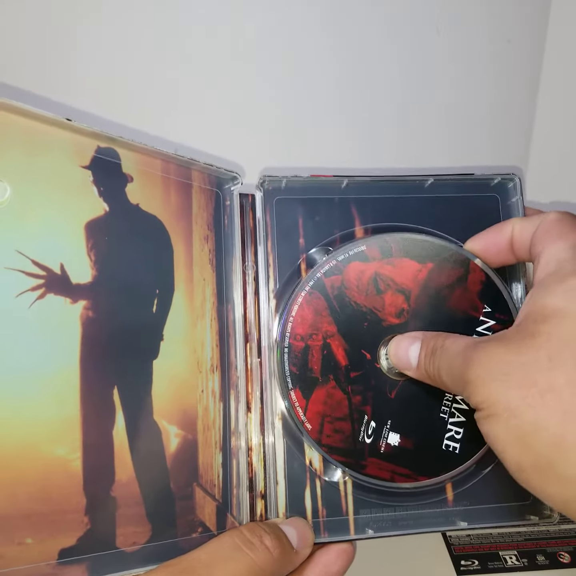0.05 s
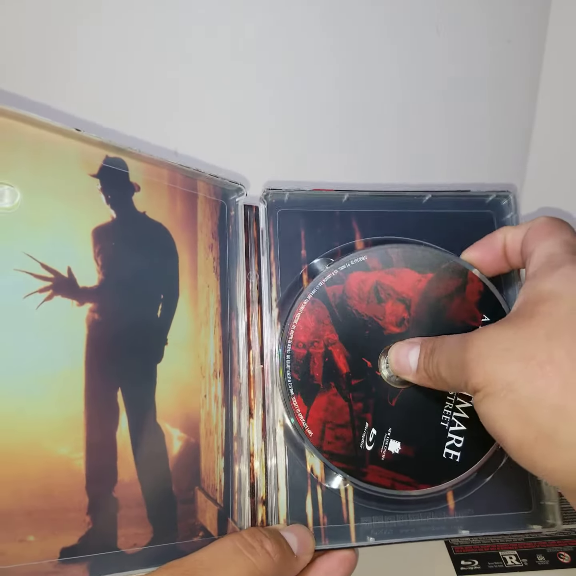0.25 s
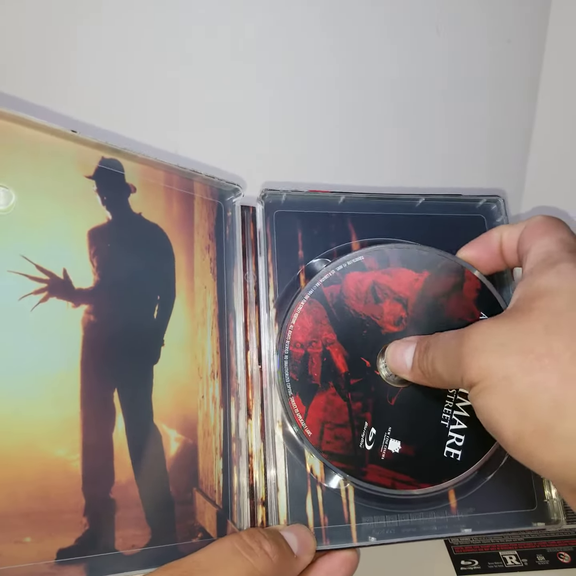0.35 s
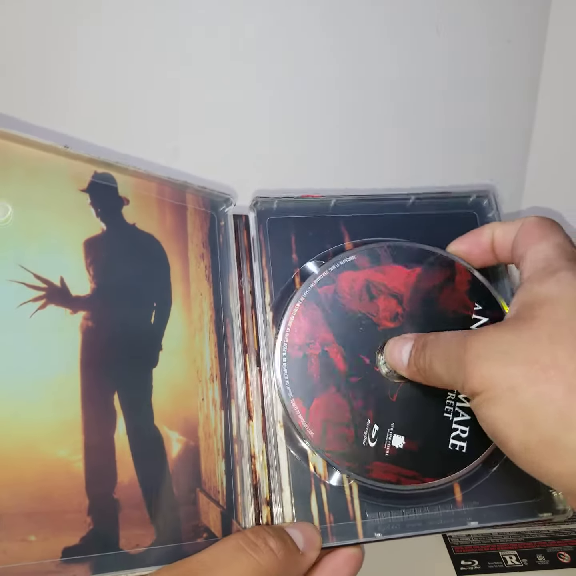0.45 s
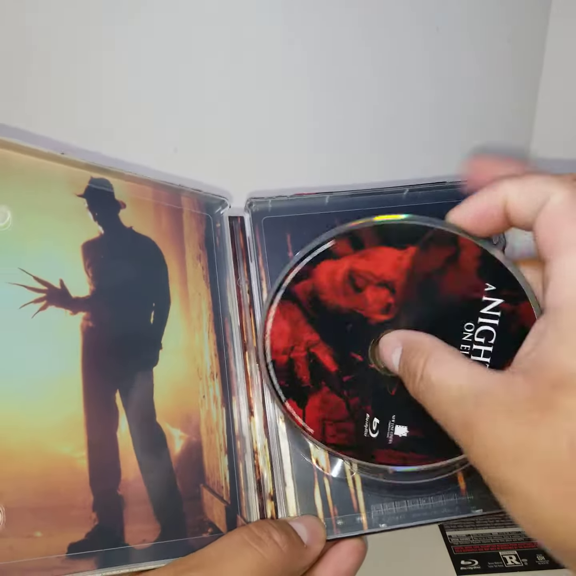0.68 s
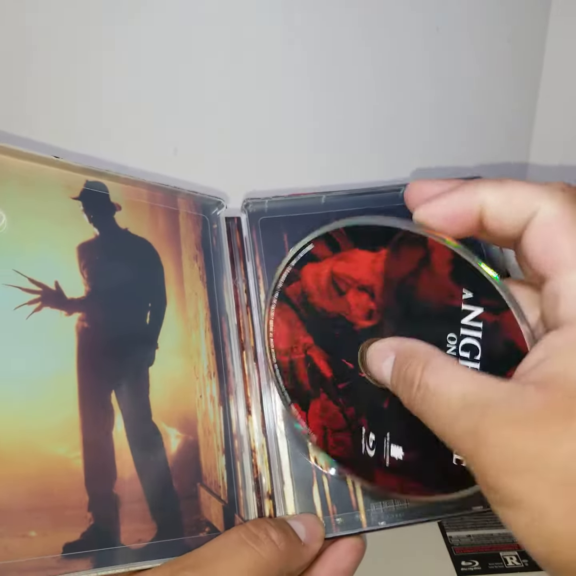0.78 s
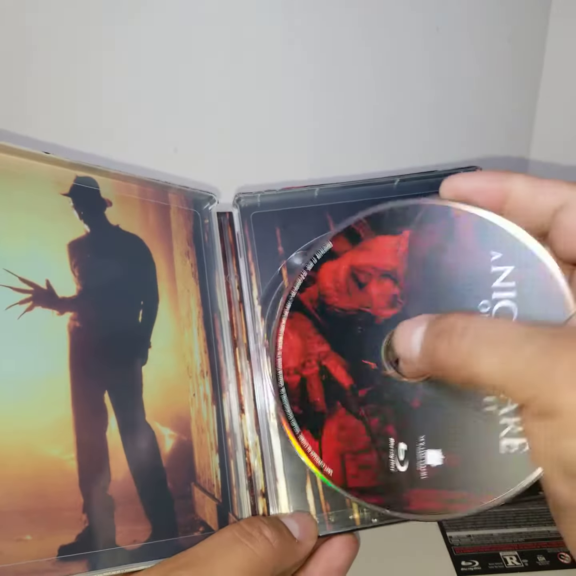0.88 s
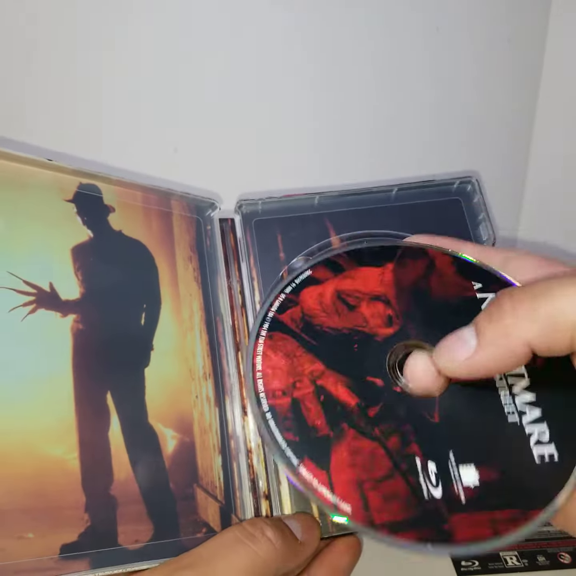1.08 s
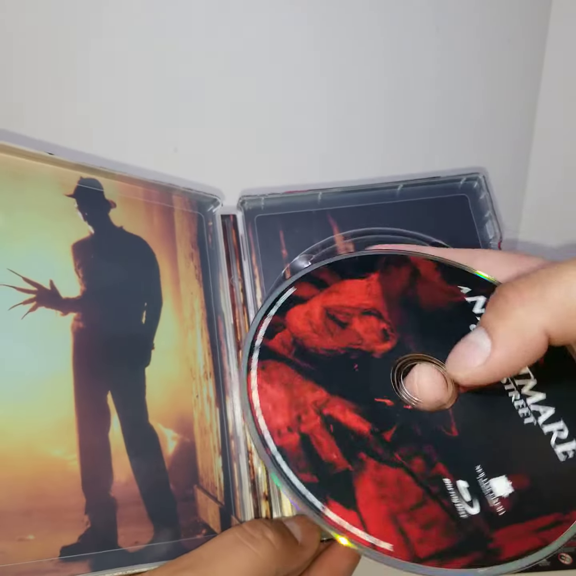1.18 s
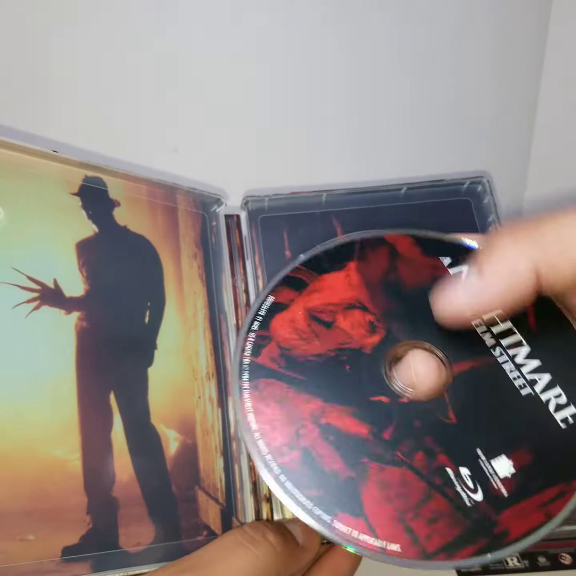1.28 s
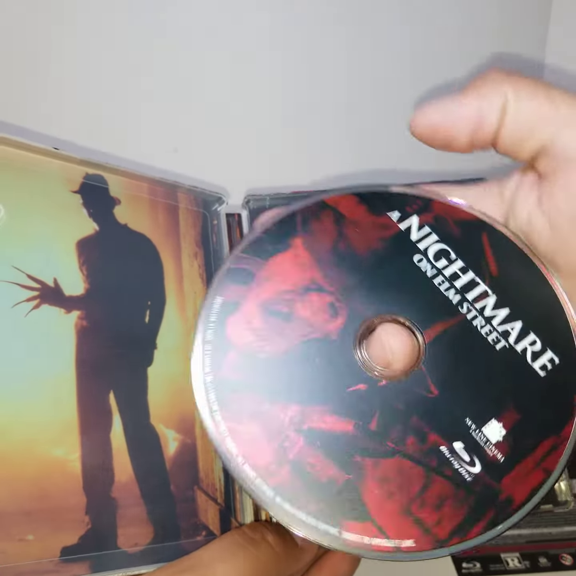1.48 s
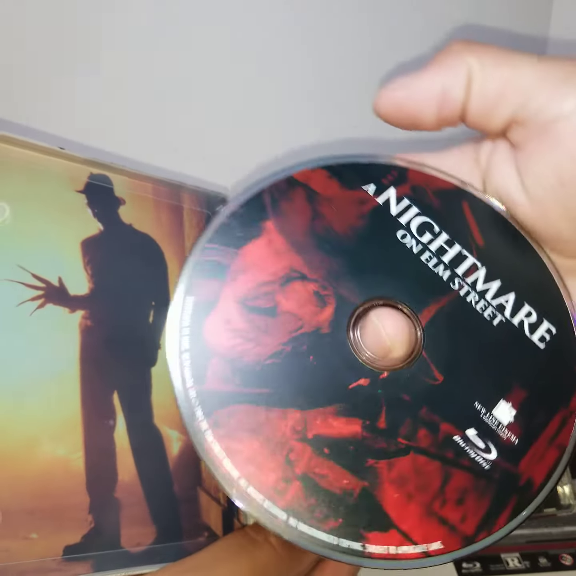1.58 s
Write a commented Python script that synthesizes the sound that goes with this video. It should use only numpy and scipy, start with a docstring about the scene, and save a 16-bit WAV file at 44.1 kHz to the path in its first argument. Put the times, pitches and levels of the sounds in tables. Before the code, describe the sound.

A disc snaps off its plastic case hub, followed by a few light ticks.

```python
"""A disc snaps over the teeth of the hub in its plastic case, close by in a small quiet room.
A thumb presses the hub: the disc slips in two quick bursts of cracks, the plastic rings and the
bent case thumps. Light ticks and a soft brush follow as the disc is lifted out.
Snaps and ticks leave a short echo. Behind them are two faint low tones and soft room noise,
which sinks after the snap and swells back at the end."""
import sys
import numpy as np
from scipy import signal
from scipy.fft import rfft, irfft
from scipy.io import wavfile
from scipy.ndimage import uniform_filter1d, minimum_filter1d

SR = 44100
rng = np.random.default_rng(int(sys.argv[2]) if len(sys.argv) > 2 else 0)


def waveform_to_disk(signal):
    """Save audio, clipped to [-1, 1], as 16-bit WAV at the path in sys.argv[1]."""
    frames = np.transpose(np.atleast_2d(signal))
    scaled = np.clip(frames, -1, 1) * 32767
    samples = np.round(scaled).astype(np.int16)
    wavfile.write(sys.argv[1], SR, samples)


N = 72765
T = np.arange(N) / SR

# Levels in a table are relative to each other. "fade" is the time a sound takes to drop by 60 dB.
# how strong the room noise is at each pitch: f/Hz, level/dB
NOISE_COLOUR = [(15, -44), (25, -15), (82, -7), (133, -6.5), (227, -1), (267, -4), (313, -4), (457, -10),
                (631, -6), (895, -11), (1620, -12), (5880, -25), (8580, -37), (10600, -51), (15500, -58)]
# how the room noise sinks and returns: t/s, low part's level/dB, high part's level/dB
NOISE_LEVELS = [(0, -40.5, -45), (0.2, -40, -44), (0.38, -46, -51), (0.62, -51.5, -54.5),
                (0.85, -53.5, -57), (1.05, -53.5, -56.5), (1.31, -54, -58.5), (1.41, -50.5, -53.5),
                (1.5, -44.5, -50.5), (1.65, -45, -47)]
# faint background tones: peak t/s, width/s, f/Hz, level/dB
TONES = [(0.662, 0.084, 539.6, -53.5), (1.116, 0.088, 338, -54)]
# how strong the echo is at each pitch: f/Hz, level/dB
ECHO_COLOUR = [(100, -14), (400, -9), (1100, -15.5), (1600, -14), (2100, -8.5), (2450, 0.5), (3100, -5),
               (3500, -9), (4400, -8.5), (4850, -5.5), (5600, -12), (7200, -19.5), (10000, -34),
               (15500, -48)]
# the hiss of the disc brushing the tray: f/Hz, level/dB
BRUSH_COLOUR = [(1000, -17), (3000, -1), (6000, 3), (9800, -13), (11500, -22), (15500, -30)]
# the noisy crack of each contact: f/Hz, level/dB
CRACK_COLOUR = [(100, -16), (400, 1), (1100, 2.5), (1600, 1), (2700, -5.5), (5500, 2), (7500, -12),
                (10000, -20), (15500, -25)]
# the loose disc touches hub and tray: t/s, level/dB, treble cut f/Hz, ring level/dB
TICKS = [(0.6335, -35, 3000, 3), (0.6611, -19.5, 7500, -3), (0.6981, -22, 7000, -11),
         (0.7110, -25, 5500, -5), (0.7356, -38, 3500, 0), (0.7672, -40, 6000, -5)]
# the notes of the disc's edge: f/Hz, level/dB, fade/s
EDGE_NOTES = [(2440, -8.5, 0.014), (3650, -3, 0.0051), (4220, -7, 0.011), (6100, -18.5, 0.0073),
              (7740, -15.5, 0.0041)]
# the case springs back in the hand: t/s, level/dB, f/Hz
THUMPS = [(0.2473, -26, 229), (0.2571, -25, 113), (0.2732, -27.5, 80.4)]
# the notes of the freed disc: f/Hz, level/dB, fade/s
DISC_NOTES = [(2280, -2.5, 0.27), (2464, -6, 0.35), (2455, 1, 0.23), (2520, -3, 0.22), (2650, -1, .24),
              (2794, 2, 0.17), (2928, -6, 0.14), (3005, -6, 0.18), (3230, 2.5, 0.16), (3630, -13, 0.22),
              (4750, -5.5, 0.24), (4900, 1, 0.18)]
# the notes of hub and tray: f/Hz, level/dB, fade/s
HUB_NOTES = [(463, -19, .02), (882, -19, .014), (1140, -27, .02), (1853, -20.5, 0.02), (2280, -20.5, 0.027),
             (2490, -11, 0.028), (2940, -13, 0.021), (3270, -16.5, .016), (3830, -18.5, 0.0086),
             (4880, -11, 0.013), (5600, -21.5, 0.011), (6600, -30, 0.0083), (8600, -26, 0.01),
             (11500, -31, 0.011)]
# the disc slips over the hub's teeth: t/s, level/dB, treble cut f/Hz
SLIPS = [(0.2293, -1.5, 9100), (0.2311, 5, 6400), (0.2342, -12, 6000), (0.2392, -16.5, 5500),
         (0.2416, -3, 5000), (0.2463, 4.5, 11000), (0.2493, -11, 7000), (0.2526, -20, 5000)]


def from_db(db):
    """Turn decibels into a number to multiply by."""
    return 10 ** (np.asarray(db) / 20)


def rms_one(x):
    """Scale a sound so that its average strength (rms) is 1."""
    return x / np.sqrt(np.mean(x ** 2) + 1e-20)


def keep_band(x, hz, side, order=2):
    """Keep the "low" or "high" side of hz; a higher order cuts more sharply."""
    return signal.sosfilt(signal.butter(order, hz, side, fs=SR, output="sos"), x)


def coloured_noise(colour):
    """Noise with its lows and highs shaped by a colour table."""
    hz, db = np.transpose(colour)
    pitches = np.maximum(np.fft.rfftfreq(N, 1 / SR), 1)
    gains = from_db(np.interp(np.log(pitches), np.log(hz), db))
    return rms_one(irfft(rfft(rng.standard_normal(N)) * gains, N))


def fade(fade_s):
    """A curve that drops by 60 dB in fade_s seconds."""
    return np.exp(-np.log(1000) * T / fade_s)


def rise(rise_s):
    """A curve that climbs from 0 towards 1, most of the way in rise_s seconds."""
    return 1 - np.exp(-T / rise_s)


def swell(peak_s, width_s):
    """A bell-shaped rise and fall around peak_s."""
    return np.exp(-.5 * ((T - peak_s) / width_s) ** 2)


def at(t, x):
    """Delay a sound to start at t seconds."""
    return np.concatenate([np.zeros(int(t * SR)), x])[:N]


def plastic_ring(notes, spread_db=1.63):
    """A knock sounds all of a part's own notes at once, each with a slightly random strength."""
    out = 0
    for k, (hz, db, fade_s) in enumerate(notes):
        strength = from_db(db + spread_db * rng.normal())
        out += (-1) ** k * strength * fade(fade_s) * np.sin(2 * np.pi * hz * T)
    return out


def room_noise(split_hz=1280):
    """A soft rush whose low and high parts sink and return."""
    times, low_db, high_db = np.transpose(NOISE_LEVELS)
    out = 0
    for db, side in ((low_db, "low"), (high_db, "high")):
        rush = rms_one(keep_band(coloured_noise(NOISE_COLOUR), split_hz, side))
        out += from_db(np.interp(T, times, db)) * rush
    return out


def faint_tones(waver_hz=7.7):
    """Low tones come and go, their pitch wavering a little."""
    out = 0
    for t, width_s, hz, db in TONES:
        waver = rms_one(keep_band(rng.standard_normal(N), hz=16.6, side="low"))
        cycles = np.cumsum(hz + waver_hz * waver) / SR
        out += from_db(db) * swell(t, width_s) * np.sin(2 * np.pi * cycles)
    return out


def room_echo(split_hz=4000, delay_s=0.0055):
    """Each slip and tick leaves a blurred echo in the plastic's colour; the treble dies sooner."""
    contacts = [(t, db) for t, db, _ in SLIPS]
    contacts += [(t, db - 12) for t, db, _, _ in TICKS]  # ticks echo less
    wash = coloured_noise(ECHO_COLOUR)
    lows = signal.sosfiltfilt(signal.butter(2, split_hz, fs=SR, output="sos"), wash)
    out = 0
    for band, fade_s in ((lows, 0.29), (wash - lows, 0.26)):
        shape = rise(0.002) * fade(fade_s)
        power = sum(at(t + delay_s, (from_db(db) * shape) ** 2) for t, db in contacts)
        out += band * np.sqrt(power)
    return from_db(-29.5) * out


def disc_brush():
    """The disc slides past the tray with a brief, soft hiss."""
    return from_db(-65) * swell(peak_s=1.023, width_s=0.03) * coloured_noise(BRUSH_COLOUR)


def disc_ticks():
    """The loose disc touches hub and tray: tiny cracks that ring its edge, with no bass."""
    out = 0
    for t, db, hz, ring_db in TICKS:
        ring = from_db(ring_db) * plastic_ring(EDGE_NOTES)
        crack = from_db(-13) * coloured_noise(CRACK_COLOUR) * fade(0.0047)
        out += keep_band(at(t, from_db(db) * (ring + crack)), hz, "low", order=1)
    return keep_band(out, hz=1700, side="high", order=3)


def case_thump():
    """The bent case springs back in the hand with low swings that die quickly."""
    return sum(at(t, -from_db(db) * np.sin(2 * np.pi * hz * T) * fade(0.048)) for t, db, hz in THUMPS)


def hub_snap(release_s=0.2465):
    """Each slip over a tooth cracks and rings hub and tray; once free, the disc rings on."""
    out = at(release_s, from_db(-29.5) * plastic_ring(DISC_NOTES))
    for t, db, hz in SLIPS:
        ring = from_db(-0.5) * plastic_ring(HUB_NOTES)
        crack = from_db(-11.5) * coloured_noise(CRACK_COLOUR) * fade(0.015)
        slip = from_db(db) * (ring + crack) * rise(0.00026)
        out += keep_band(at(t, slip), hz, "low")
    return out


def scene():
    """Add the disc, its case and the room into one channel."""
    disc_and_case = hub_snap() + case_thump() + disc_ticks() + disc_brush()
    return (disc_and_case + room_echo() + room_noise() + faint_tones())[None]


def record(dry, ceiling=0.95, top_hz=15700):
    """Briefly turn down any peak above the ceiling, then cut the highest treble."""
    needed_gain = ceiling / np.maximum(np.abs(dry), ceiling)
    smooth_gain = uniform_filter1d(minimum_filter1d(needed_gain, size=21), size=21)
    treble_cut = signal.ellip(10, .2, 80, top_hz, fs=SR, output="sos")
    return signal.sosfilt(treble_cut, dry * smooth_gain)


dry = scene()
out = record(dry)
waveform_to_disk(out)
```